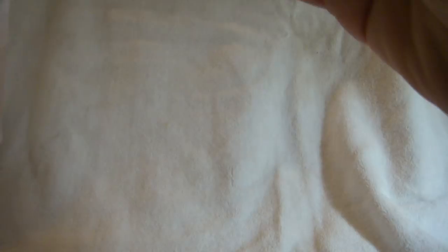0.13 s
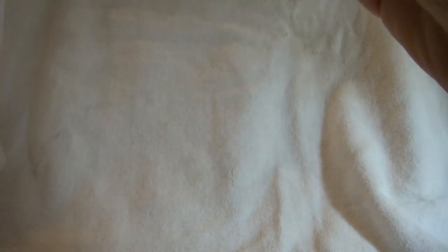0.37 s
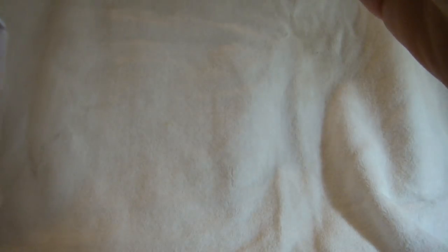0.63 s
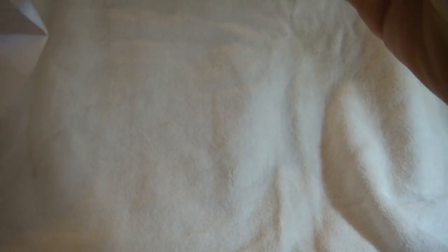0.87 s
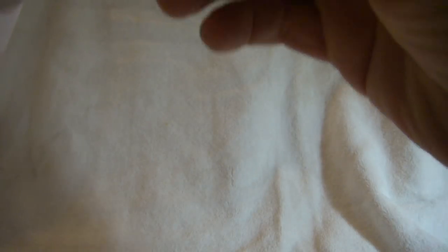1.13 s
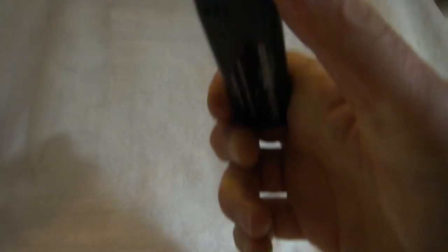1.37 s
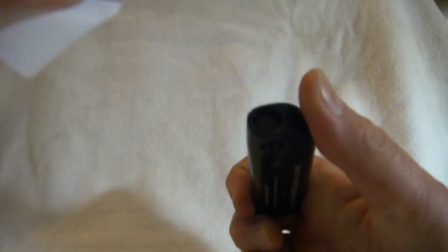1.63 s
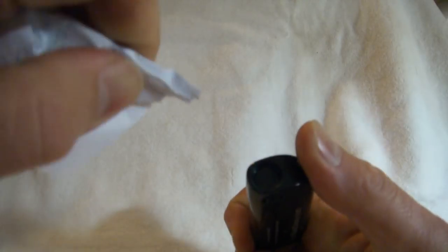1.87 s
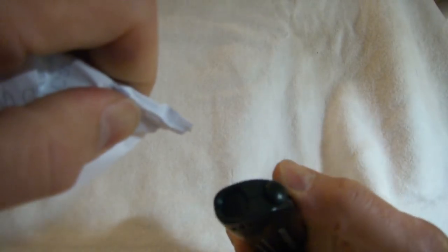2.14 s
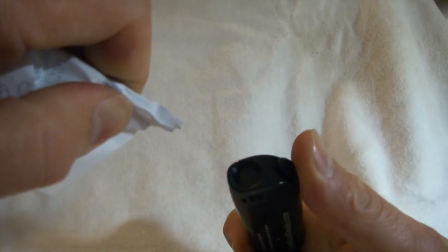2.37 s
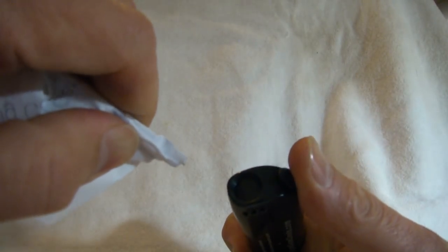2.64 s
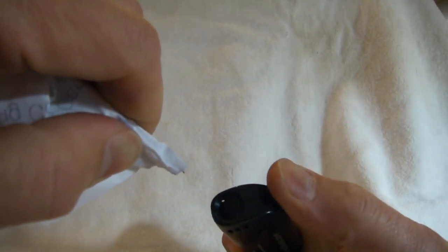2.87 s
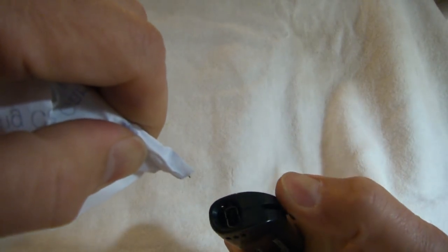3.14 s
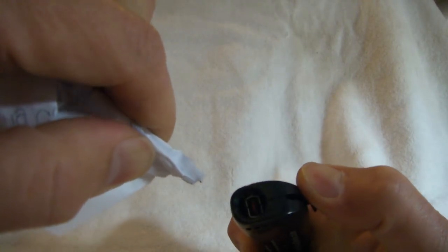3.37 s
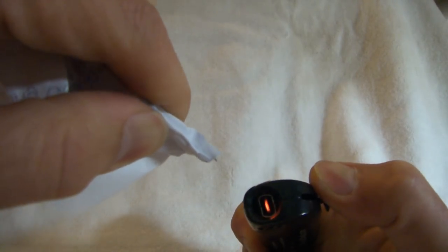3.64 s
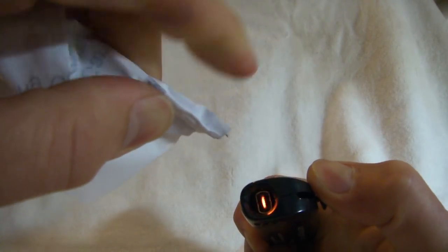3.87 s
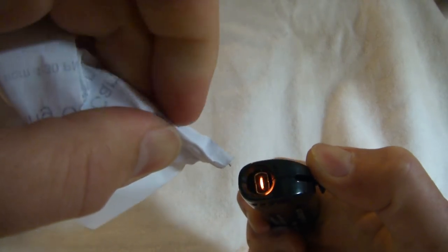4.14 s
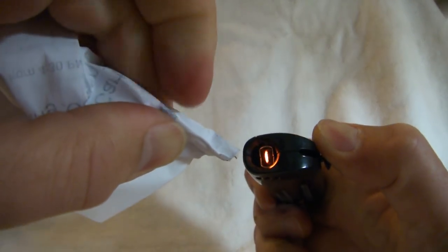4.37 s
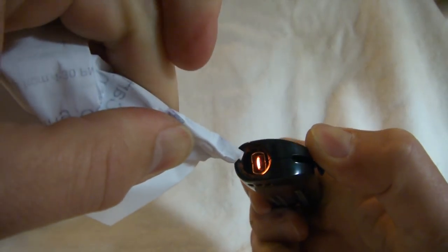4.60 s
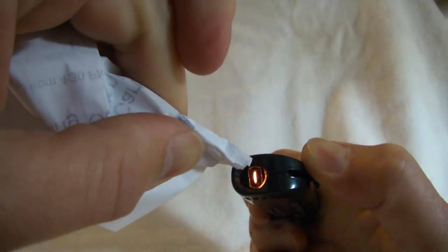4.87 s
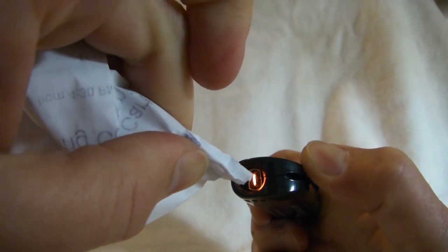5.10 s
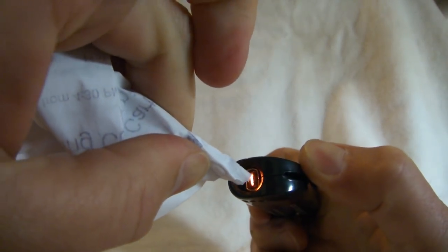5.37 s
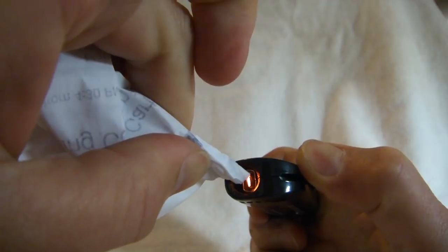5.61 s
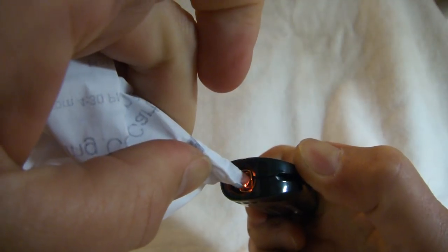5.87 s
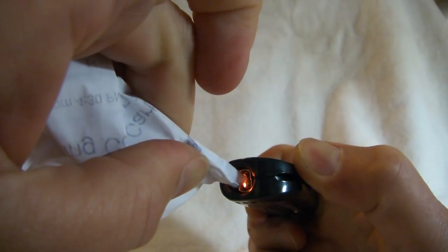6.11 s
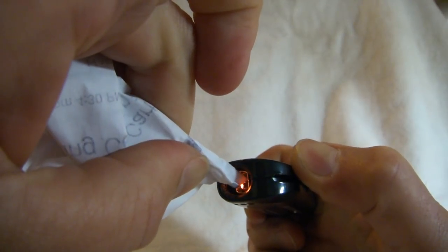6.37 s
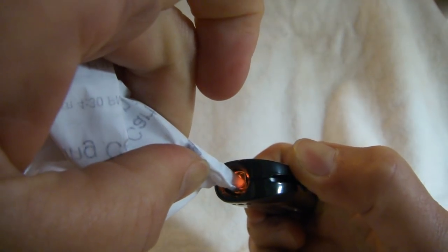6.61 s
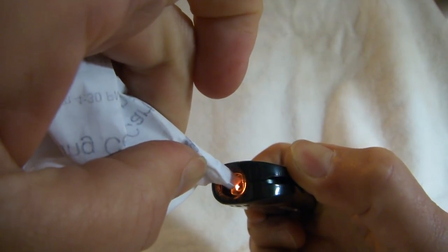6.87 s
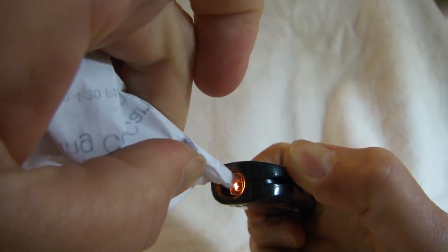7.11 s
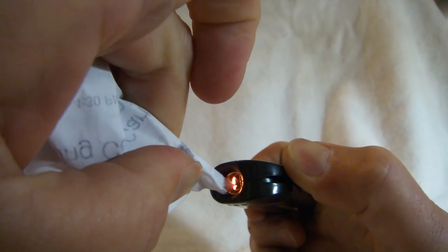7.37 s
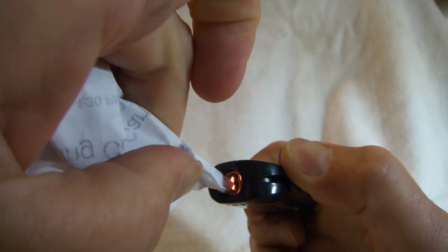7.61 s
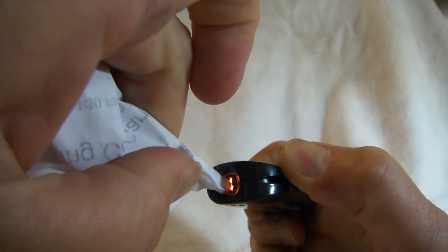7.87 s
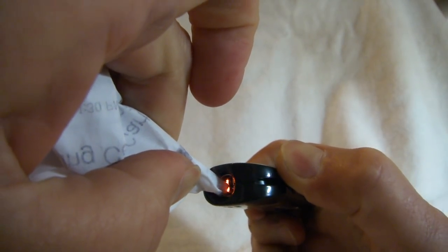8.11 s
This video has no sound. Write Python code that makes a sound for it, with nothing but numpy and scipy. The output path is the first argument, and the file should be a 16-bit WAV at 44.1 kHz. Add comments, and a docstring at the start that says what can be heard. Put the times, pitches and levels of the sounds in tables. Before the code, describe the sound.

Fingers crumple a small stiff piece of paper right beside the microphone: a flurry of tiny crackles, then a few hard, bright snaps over soft cloth rubbing. A small plastic casing knocks, slides under a thumb and clicks very loudly around two seconds. Brief rustles follow, then sparse faint ticks and one more duller click near six seconds. Close stereo pickup, slightly left, in a quiet room with low hum.

```python
"""A flurry of dry snaps over a low cloth shuffle: fingers crumple stiff paper close to two microphone ports.
Creases are slip impulses exciting damped modes; rubs are dense random slips exciting the same modes.
A small plastic casing knocks, slides and clicks in the other hand;
later come sparser ticks, faint rubs and one loud casing click.
A soft room noise with mains hum, made of filtered noise, lies below; the loudest snaps overload the input."""
import sys
import numpy as np
from scipy import signal
from scipy.fft import rfft, irfft
from scipy.io import wavfile

SR = 44100
rng = np.random.default_rng(int(sys.argv[2]) if len(sys.argv) > 2 else 0)


def dump(signal):
    """Clip the signal to [-1, 1] and save it as 16-bit WAV at the path in sys.argv[1]."""
    limited = np.clip(np.atleast_2d(signal).T, -1, 1)
    pcm = np.round(limited * 32767).astype(np.int16)
    wavfile.write(sys.argv[1], SR, pcm)


def gain_from_db(level_db):
    """Turn a decibel level (scalar or array-like) into a linear amplitude factor."""
    decades = np.asarray(level_db, float) / 20
    return 10 ** decades


N = 363472   # length [samples]

# Levels of paper and casing are those at the source, ahead of the echoes and the ports.
# Creases snapping: (time [s], facet ring [Hz], peak of the ring [dB], weight = thud over ring [dB],
# crispness = crack over ring [dB])
CREASE_SNAPS = [(0.0079, 1790, -31.5, 7.5, 6), (0.02, 1920, -40.5, 16, 11.5), (0.029, 2000, -38, 5, 0),
                (0.036, 4800, -29, 4.5, 4), (0.0515, 1900, -34, 8.5, 6), (0.0615, 4300, -36, -13, 4),
                (0.069, 4730, -26, 5, 4.5), (0.078, 5200, -39, -15, -2), (0.0867, 1900, -30, 7.5, 7),
                (0.1139, 1920, -35, 2, -9), (0.1348, 4900, -23, 4, 6.5), (0.3702, 2870, -20.5, -6.5, 1.5),
                (0.4246, 4750, -25.5, 2, 4.5), (0.6522, 2920, -33, -15, -5),
                (0.6646, 3650, -6.5, -15.5, -0.5), (0.683, 3040, -23, -27, -4.5),
                (0.734, 3400, -23.5, -15, -2.5), (0.763, 2690, -31, -9, 9), (0.775, 5270, -24.5, -20, 3),
                (0.8132, 4100, -30, -3, -6), (0.8286, 2870, 0.5, -21, -6.5), (1.0576, 3200, -30, -1, -5),
                (1.066, 3370, -30.5, -21, 7), (1.0805, 4530, -33, -4, 15), (1.25, 2140, -35, -5, 0),
                (1.3542, 2040, -32, -7.5, 3.5), (1.6041, 3500, -37.5, -18, -5),
                (2.1272, 3120, -3.5, -25, -1.5), (2.14, 3180, -18.5, -27, -10),
                (2.2611, 3430, -6.5, -11, -12.5), (2.2665, 2190, -19, -3.5, -28),
                (2.427, 2240, -50.5, -9, 7), (2.706, 2840, -34, -13, -3), (2.856, 2290, -34.5, -14, -2),
                (3.005, 5570, -21, -32, 2.5), (3.025, 4800, -44, -16, 10), (3.0354, 4600, -28, -17, 7.5),
                (3.041, 3460, -24, -13, 7), (3.078, 3160, -38, -7, -3), (3.369, 3380, -33.5, 0, 2),
                (3.7207, 3400, -40, -18.5, 6), (3.9642, 3000, -33.5, -2, 0), (4.1669, 3140, -36, -6, 8),
                (4.3784, 2420, -31.5, -2.5, -2), (4.3938, 4450, -43, -17, 10),
                (4.5762, 2450, -25.5, -5.5, -1.5), (4.6148, 2050, -28.5, -7.5, -3),
                (4.894, 2430, -28, -8, -3.5), (4.9467, 2280, -35, -1.5, 1), (5.1832, 4120, -28, -15, -4.5),
                (5.861, 4200, -40.5, 2, -6), (5.8835, 3340, -32, -12, -1), (6.0013, 2370, -43.5, -11, 0),
                (6.683, 2260, -37.5, -0.5, -5), (6.701, 3940, -34.5, -6, 2), (6.918, 2160, -39.5, -17, -3),
                (6.97, 2260, -29.5, -7.5, -6), (7.025, 2930, -27.5, -13.5, -9.5),
                (7.1533, 2330, -40, -2.5, -5), (7.158, 2340, -30, -8, 0.5), (7.2573, 2220, -38, -3, -10),
                (7.601, 4160, -38.5, -6, -5), (7.7348, 3480, -24.5, -12, -7.5)]
# Rubs of skin over paper: (time of fullest pressure [s], swell by 20 dB [s], fade by 20 dB [s],
# scrape [dB], dryness = hiss over scrape [dB])
RUBS = [(0.06, 0.06, 0.096, -55, 2.5), (0.343, 0.012, 0.011, -50, 4.5), (0.628, 0.027, 0.044, -51, -8),
        (0.693, 0.025, 0.031, -51, -12), (0.737, 0.03, 0.03, -45, -5), (0.801, 0.034, 0.069, -38, 1.5),
        (1.02, 0.053, 0.07, -40, -10), (1.15, 0.039, 0.019, -51, 3), (1.175, 0.011, 0.0098, -49, 7.5),
        (1.29, 0.08, 0.098, -58.5, -0.5), (1.836, 0.12, 0.12, -60, -8), (2.091, 0.057, 0.0052, -49, -4.5),
        (2.109, 0.012, 0.02, -45, 12), (2.138, 0.009, 0.012, -36, 3), (2.272, 0.009, 0.055, -46.5, -10.5),
        (2.721, 0.099, 0.12, -48.5, -7), (2.965, 0.064, 0.044, -60.5, 8.5), (3.022, 0.031, 0.03, -53.5, 9),
        (3.425, 0.067, 0.1, -37, -16), (3.58, 0.14, 0.073, -51.5, -7), (3.79, 0.067, 0.062, -50.5, -8),
        (3.846, 0.022, 0.02, -42.5, -10), (3.884, 0.027, 0.015, -31, -2),
        (3.909, 0.017, 0.0076, -31.5, 1.5), (3.928, 0.0094, 0.032, -48.5, -20),
        (4.22, 0.18, 0.069, -60, -4), (4.456, 0.018, 0.029, -63.5, 4.5), (4.945, 0.0036, 0.005, -43.5, -12),
        (5.18, 0.004, 0.0058, -41.5, -12), (6.603, 0.033, 0.035, -58.5, -4.5),
        (6.692, 0.025, 0.017, -55, -6), (8.127, 0.044, 0.052, -62.5, 10)]
# Abruptly starting rustles of the sheet that die away, mostly after a snap:
# (time [s], fade by 20 dB [s], scrape [dB], dryness [dB])
SHEET_RUSTLES = [(0.842, 0.19, -31, -5), (2.129, 0.14, -38.5, -5.5), (3.9633, 0.02, -39, -8)]
# One facet sings out under a rub: (time [s], half length [s], frequency [Hz], level [dB])
FACET_SONGS = [(0.8, 0.034, 5400, -32), (0.868, 0.044, 1890, -36), (0.998, 0.058, 1480, -43.5),
               (3.427, 0.057, 3340, -32), (3.563, 0.066, 735, -53.5), (0.872, 0.046, 4420, -36.5),
               (1.045, 0.039, 3340, -45), (3.894, 0.033, 3230, -30.5), (3.91, 0.0083, 5660, -35.5),
               (3.897, 0.038, 640, -47.5), (3.971, 0.013, 654, -50)]

# Modes of the crumpled sheet in four groups, low to high: (frequency [Hz], level [dB], t60 [s])
SHEET_THUD_MODES = [(665, -1.5, 0.014), (1143, 1, 0.013), (1417, 8.5, 0.0062), (1830, 1.5, 0.011)]
SHEET_SCRAPE_MODES = [(2230, -2, 0.0079), (2775, -1.5, 0.0081), (3240, 2.5, 0.0047), (4300, 1, 0.0031)]
SHEET_CRACK_MODES = [(4593, 1.2, 0.0089), (5290, 3.6, 0.0064), (6330, 1.9, 0.004)]
SHEET_TICK_MODES = [(7080, 2.5, 0.0011), (8260, -3, 0.0053), (8510, -0.5, 0.0024), (9530, -8.5, 0.0014)]

# Small plastic casing knocked in the hand: (time [s], peak level [dB], main ring set by the grip [Hz],
# rattle over knock [dB])
CASING_KNOCKS = [(1.2028, -29.5, 807, -19), (2.2652, -24, 650, -8)]
# Modes of the hollow casing: (multiple of the main ring [ratio], level [dB], t60 [s])
HOLLOW_MODES = [(.37, -1.5, 0.046), (.84, -0.5, 0.052), (1.0, 3, 0.038), (1.49, 7.5, 0.011),
                (2.15, -4, 0.054)]
# A catch on the casing clicks over: (time [s], peak level [dB], brightness [dB per octave],
# thin top crack over peak [dB])
CATCH_CLICKS = [(2.0979, 0.5, 10, -4), (5.894, -8.5, 0.5, -40)]
# Modes of the catch: (frequency [Hz], level [dB], t60 [s])
CATCH_BODY_MODES = [(566, -10, 0.016), (1040, -7.5, 0.0094), (1770, 1, 0.0086), (2820, -0.5, 0.0066),
                    (4050, 2.5, 0.0059), (4530, 2.5, 0.0062), (6350, -11.5, 0.0058), (7800, -18, 0.0027),
                    (8800, -23, 0.0036)]
# Catch skidding over its ridge: (time [s], length [s], first slip rate [Hz], last slip rate [Hz], level [dB])
RIDGE_SKIDS = [(2.0985, .0017, 2580, 9600, -0.63)]
# Thumb sliding over the smooth casing: (time [s], level [dB])
THUMB_SLIDE = [(1.24, -80), (1.3, -62), (1.385, -53.5), (1.408, -35), (1.435, -53), (1.47, -75)]
# Narrow bands in which the slide sings: (centre [Hz], width [Hz], level [dB])
WHISTLE_BANDS = [(2050, 270, -1), (3120, 190, 1), (4300, 400, -1), (5960, 300, -1), (8350, 1200, -3)]

# Spectra of the sum and difference of the ports: (frequency [Hz], relative density [dB per Hz])
ROOM_SUM_COLOUR = [(18, -52), (30, -52), (64, -4.5), (88, -23), (109, -15), (244, -1.5), (276, -7.5),
                   (519, -9.5), (888, -11), (979, -9.5), (1220, -13.5), (1410, -3.5), (1680, -13),
                   (2410, -15.5), (5800, -19), (10200, -27.5), (13200, -94), (22000, -120)]
ROOM_DIFFERENCE_COLOUR = [(30, -36), (97, -16), (143, -13.5), (173, -12.5), (289, -11.5), (471, -15),
                          (631, -4), (696, -16), (1000, -7), (1250, -15.5), (1450, -6.5), (1700, -14.5),
                          (2300, -19.5), (4440, -20.5), (10200, -31.5), (13200, -80), (22000, -120)]
# Balance of the room noise: (frequency [Hz], left over right [dB])
ROOM_BALANCE = [(60, -3), (110, 0.5), (190, -1), (330, 0), (580, -0.5), (1010, 3), (1780, 8), (3140, -1.5),
                (5520, 2), (9710, -2)]
# Wavering hum bands: (centre [Hz], width [Hz], level [dB])
HUM_BANDS = [(60.2, 4, -78), (120.4, 5.7, -69.5), (182, 7.2, -64.5), (254, 8.4, -69.5), (389.6, 7.9, -67.5)]
# Thin hiss at the very top, swelling for a while: (time [s], level [dB])
HISS_LEVEL = [(5.74, -79.5), (5.79, -72), (7.291, -71.5), (7.33, -79)]
# Its spectrum: (frequency [Hz], relative density [dB per Hz])
HISS_COLOUR = [(9500, -44), (10600, -19), (11700, -7), (12400, -16), (13500, -9), (15000, -1), (16000, -22)]
# Sleeve dragging on cloth: (time [s], level [dB])
SLEEVE_LEVEL = [(.0, -56), (.2, -68), (.95, -60.5), (1.15, -55.5), (1.45, -55), (1.65, -84), (4.5, -66),
                (4.6, -49.5), (4.7, -78)]
# Its dull, low spectrum: (frequency [Hz], relative density [dB per Hz])
SLEEVE_COLOUR = [(60, -36), (130, -14.0), (250, -1.5), (450, -8.5), (1200, -48)]

ROOM_SUM_DB, ROOM_DIFFERENCE_DB = -54, -50.5
RING_T60_S = 0.0094
SLIP_S, LATER_SLIPS = 0.0005, 0.3      # typical spread of later slips, and their size beside the first
TICK_DB, TICK_PER_CRISP = -7.5, 1.76   # the topmost modes follow crispness more steeply than the crack
ROUNDNESS, RUSTLE_ROUNDNESS = 3.9, 1.2   # the dB fall grows as this power of the time from the top
RUSTLE_RISE_S = 0.0023
BODY_DB, BODY_PER_SCRAPE = -55, 0.74     # body of a rub when its scrape is -50 dB; dB per dB of scrape
SIZZLE_DB, SIZZLE_PER_DRY = -0.5, 0.43   # sizzle over scrape; dB per dB of dryness
SINGING_CYCLES, SINGING_LONGEST_S = 19, 0.014   # time to die by 60 dB, and its upper limit
RATTLE_PER_S, RATTLE_T60_S = 440, 0.19   # loose touches that follow a knock
KNOCK_CUT_HZ = 2200   # the pad of the hand softens the contact
CATCH_DELAY_S, CATCH_FIRST_TOUCH = 0.0008, 0.25   # a lighter touch precedes the full blow
ECHO_DB, ECHO_T60_S, ECHO_CUT_HZ = -17.5, 0.094, 1250
PORT_LAG_S, PORT_TURN_RAD = 5.5e-5, 1.64   # lag in the bass; greatest phase turn
PORT_CUT_HZ, AIR_HZ, AIR_DB = 10300, 12400, -7.5
LEFT_LEAN_DB, PORT_GAIN_DB = 1.5, 1.5


def rms_one(x):
    """Normalisation to unit mean power."""
    return x / np.sqrt(np.mean(x ** 2) + 1e-20)


def peak_one(x):
    """Normalisation to unit peak height."""
    return x / np.max(np.abs(x))


def coloured(spectrum, channels=1):
    """Spectral shaping: white noise weighted by a level curve over log frequency, at unit power."""
    hz, level_db = np.transpose(spectrum)
    bins = np.maximum(np.fft.rfftfreq(N, 1 / SR), 1)
    shape = gain_from_db(np.interp(np.log(bins), np.log(hz), level_db))
    white = rng.standard_normal((channels, N))
    return rms_one(irfft(rfft(white) * shape, N))


def envelope(points, **outside):
    """Amplitude modulation: a level course in dB, linear between its points, turned into a gain."""
    s, db = np.transpose(points)
    return gain_from_db(np.interp(np.arange(N) / SR, s, db, **outside))


def ring(clicks, hz, t60):
    """Damped resonance: a unit click excites an exponentially decaying sine of height 1."""
    r, w = gain_from_db(-60 / (t60 * SR)), 2 * np.pi * hz / SR
    return signal.lfilter([0, np.sin(w)], [1, -2 * r * np.cos(w), r * r], clicks + 1e-18)


def noise_band(noise, hz, width_hz):
    """Reciprocity of bandwidth and decay: a resonance of given width filters noise, at unit power."""
    return rms_one(ring(noise, hz, np.log(1000) / np.pi / width_hz))


def struck(clicks, modes, strengths, together=False):
    """Modal superposition: signs alternate from mode to mode, or all start alike for an abrupt crack."""
    total = 0
    for k, (strength, (hz, db, t60)) in enumerate(zip(strengths, modes)):
        sign = 1 if together else (-1) ** k
        total = total + strength * gain_from_db(db) * sign * ring(clicks, hz, t60)
    return total


def above(x, hz):
    """Radiation cut-off: a small body radiates little below its modes."""
    return signal.sosfilt(signal.butter(3, hz, "high", fs=SR, output="sos"), x)


def grains(per_s, spread_db, clump_db):
    """Stick-slip as a clumped random process: fibre slips, mostly small, partly shared by the two ports."""
    knots = rng.standard_normal(N // 256 + 2)
    course = np.interp(np.arange(N) / 256, np.arange(len(knots)), knots)
    clumps = gain_from_db(clump_db * course)
    heights = gain_from_db(spread_db * np.minimum(rng.exponential(1, (3, N)), 5))
    sizes = heights * rng.choice([-1, 1], (3, N))
    common, *private = sizes * (rng.random((3, N)) < per_s * clumps / SR)
    return common + .5 * np.array(private)


def room():
    """Diffuse background: independent sum and difference noises, with narrow hum bands in the sum."""
    mid = gain_from_db(ROOM_SUM_DB) * coloured(ROOM_SUM_COLOUR)[0]
    side = gain_from_db(ROOM_DIFFERENCE_DB) * coloured(ROOM_DIFFERENCE_COLOUR)[0]
    for hz, width_hz, db in HUM_BANDS:
        mid = mid + gain_from_db(db) * noise_band(rng.standard_normal(N), hz, width_hz)
    hz, lean_db = np.transpose(ROOM_BALANCE)
    lean = gain_from_db(np.interp(np.fft.rfftfreq(N, 1 / SR), hz, lean_db) / 2)
    return irfft(rfft([mid + side, mid - side]) * [lean, 1 / lean], N)


def top_hiss():
    """Band-shaped noise: a faint hiss in the topmost treble, independent at the two ports."""
    return envelope(HISS_LEVEL) * coloured(HISS_COLOUR, channels=2)


def sleeve():
    """Cloth friction: low, soft noise, the same at both ports."""
    return envelope(SLEEVE_LEVEL) * coloured(SLEEVE_COLOUR)


def slide():
    """Resonant friction: the thumb's rubbing noise sings faintly in a few narrow bands."""
    rub = rng.standard_normal(N)
    bands = sum(gain_from_db(db) * noise_band(rub, hz, width_hz) for hz, width_hz, db in WHISTLE_BANDS)
    return envelope(THUMB_SLIDE, left=-200, right=-200) * rms_one(above(bands, 1500))


def knocks():
    """Impact excitation: each knock and the ragged rattle after it ring the hollow casing."""
    out, size = np.zeros(N), 8192
    for s, db, main_hz, rattle_db in CASING_KNOCKS:
        touches = rng.standard_normal(size) * (rng.random(size) < RATTLE_PER_S / SR)
        blow = touches * gain_from_db(rattle_db - 60 * np.arange(size) / SR / RATTLE_T60_S)
        blow[0] = 1
        blow = signal.lfilter(*signal.butter(2, KNOCK_CUT_HZ, fs=SR), blow)
        modes = [(main_hz * multiple, mode_db, t60) for multiple, mode_db, t60 in HOLLOW_MODES]
        out[round(s * SR):][:size] += gain_from_db(db) * peak_one(struck(blow, modes, np.ones(len(modes))))
    return out


def catches():
    """Double impact: a light touch, then the full blow; brightness tilts the modes and a crack is added."""
    out, size = np.zeros(N), 2048
    hz = np.array(CATCH_BODY_MODES)[:, 0]
    for s, db, bright_db, crack_db in CATCH_CLICKS:
        blow = np.zeros(size)
        blow[[0, round(CATCH_DELAY_S * SR)]] = CATCH_FIRST_TOUCH, 1
        tilt = gain_from_db(bright_db * np.log2(hz / 3000))
        body = peak_one(above(struck(blow, CATCH_BODY_MODES, tilt), 350))
        crack = gain_from_db(crack_db) * peak_one(above(blow, 5800))
        out[round(s * SR):][:size] += gain_from_db(db) * (body + crack)
    return out


def skids():
    """Accelerating stick-slip: the slip rate climbs steadily while the level swells at once and stops dead."""
    out = np.zeros(N)
    for s, length, first_hz, last_hz, db in RIDGE_SKIDS:
        t = np.arange(int(length * SR)) / SR
        rate_hz = first_hz + (last_hz - first_hz) * t / length
        slips = np.sin(2 * np.pi * np.cumsum(rate_hz) / SR)
        out[round(s * SR):][:len(t)] += gain_from_db(db) * slips * np.sqrt(np.sin(np.pi * t / length))
    return out


def singing_facets():
    """Sustained resonance: fibre slips keep a single facet ringing for the length of a rub."""
    t, total = np.arange(N) / SR, 0
    slips = grains(per_s=4000, spread_db=3.0, clump_db=3.0)
    for s, half, hz, db in FACET_SONGS:
        fall_db = np.minimum(20 * (np.abs(t - s) / half) ** ROUNDNESS, 200)
        facet = ring(slips, hz, min(SINGING_CYCLES / hz, SINGING_LONGEST_S))
        total = total + gain_from_db(db - fall_db) * rms_one(above(facet, hz / 2))
    return total


def strokes():
    """Friction-driven modes: dense fibre slips ring the whole sheet in smooth rubs and abrupt rustles."""
    t, power = np.arange(N) / SR, np.zeros((4, N))
    rubs = [(*row, ROUNDNESS) for row in RUBS]
    rubs += [(s, RUSTLE_RISE_S, *rest, RUSTLE_ROUNDNESS) for s, *rest in SHEET_RUSTLES]
    for s, swell, fade, scrape_db, dry_db, roundness in rubs:
        now = slice(max(int((s - 2 * swell) * SR), 0), int((s + 2 * fade) * SR))
        away = np.where(t[now] < s, (s - t[now]) / swell, (t[now] - s) / fade)
        body_db = BODY_DB + BODY_PER_SCRAPE * (scrape_db + 50)
        sizzle_db = scrape_db + SIZZLE_DB + SIZZLE_PER_DRY * dry_db
        level_db = np.array([body_db, scrape_db, sizzle_db, scrape_db + dry_db])
        power[:, now] += gain_from_db(level_db[:, None] - 20 * away ** roundness) ** 2
    coarse = grains(per_s=4000, spread_db=3.0, clump_db=4.0)
    fine = grains(per_s=6000, spread_db=3.0, clump_db=3.0)
    # body, scrape, sizzle and hiss: (slips, modes, lower cut-off in Hz)
    groups = [(coarse, SHEET_THUD_MODES, 400), (coarse, SHEET_SCRAPE_MODES, 1900),
              (coarse + fine, SHEET_CRACK_MODES, 4300), (fine, SHEET_TICK_MODES, 6800)]
    total = 0
    for p, (slips, modes, hz) in zip(power, groups):
        total = total + np.sqrt(p) * rms_one(above(struck(slips, modes, np.ones(4)), hz))
    return total


def snaps():
    """Buckling: a crease yields in a few quick slips that strike the facet's ring and the sheet's modes."""
    size = 2048
    out = np.zeros((2, N + size))
    chance = rng.standard_normal((len(CREASE_SNAPS), 60))
    for (s, hz, ring_db, weight_db, crisp_db), z in zip(CREASE_SNAPS, chance):
        tick_db = TICK_DB + TICK_PER_CRISP * crisp_db
        peak_db = ring_db + np.array([weight_db, 0, crisp_db, tick_db])
        slips = np.zeros(size)
        slips[0] = 1
        slips[(np.abs(z[:3]) * SLIP_S * SR).astype(int) + 2] += LATER_SLIPS * z[3:6]
        at = round(s * SR)
        for side in range(2):
            # each port hears the modes with slightly other strengths
            own = gain_from_db(1.5 * z[15:30] + 2 * z[30 + 15 * side:45 + 15 * side])
            facet = ring(slips, hz, RING_T60_S) + .5 * struck(slips, SHEET_SCRAPE_MODES, own[4:])
            parts = [above(struck(slips, SHEET_THUD_MODES, own), 296),
                     above(facet, 2340),
                     above(struck(slips, SHEET_CRACK_MODES, own[8:], together=True), 4000),
                     above(struck(slips, SHEET_TICK_MODES, own[11:]), 3750)]
            out[side, at:at + size] += sum(gain_from_db(db) * peak_one(part) for db, part in zip(peak_db, parts))
    return out[:, :N]


def echoes(x):
    """Early reflection: hands and soft cloth return a short, dull smear, different at each port."""
    t = np.arange(int(.25 * SR)) / SR
    smear = rng.standard_normal((2, len(t))) * gain_from_db(-60 * t / ECHO_T60_S) * (t > .0012)
    smear = signal.lfilter(*signal.butter(1, ECHO_CUT_HZ, fs=SR), smear)
    smear /= np.sqrt(np.sum(smear ** 2, axis=1, keepdims=True))
    return gain_from_db(ECHO_DB) * signal.fftconvolve(x, smear, axes=1)[:, :N]


def ports(left, right):
    """Arrival differences and port filtering: the right is later and softer, and both dip near the top."""
    turn = 2 * np.pi * np.fft.rfftfreq(N, 1 / SR) * PORT_LAG_S / PORT_TURN_RAD
    # the lag shrinks toward the treble
    right = irfft(rfft(right) * np.exp(-1j * PORT_TURN_RAD * np.tanh(turn)), N)
    near = np.array([left * gain_from_db(LEFT_LEAN_DB / 2), right * gain_from_db(-LEFT_LEAN_DB / 2)])
    # the ports close steeply at the top, dip, and let a little air through above
    closed = signal.sosfilt(signal.butter(8, PORT_CUT_HZ, fs=SR, output="sos"), near)
    return gain_from_db(PORT_GAIN_DB) * (closed + gain_from_db(AIR_DB) * above(near, AIR_HZ))


def scene():
    """Superposition: paper and casing, nearer the left port, add to the cloth and room noise."""
    handled = slide() + knocks() + catches() + skids() + singing_facets() + strokes() + snaps()
    left, right = handled + echoes(handled)
    return room() + top_hiss() + sleeve() + ports(left, right)


def roll_off(x):
    """The treble ends steeply here."""
    return signal.sosfilt(signal.butter(12, 15800, fs=SR, output="sos"), x)


def record(dry):
    """Hard clipping: the input overloads at full scale."""
    mix = np.clip(dry, -1, 1)
    return roll_off(mix)


dry = scene()
out = record(dry)
dump(out)
```